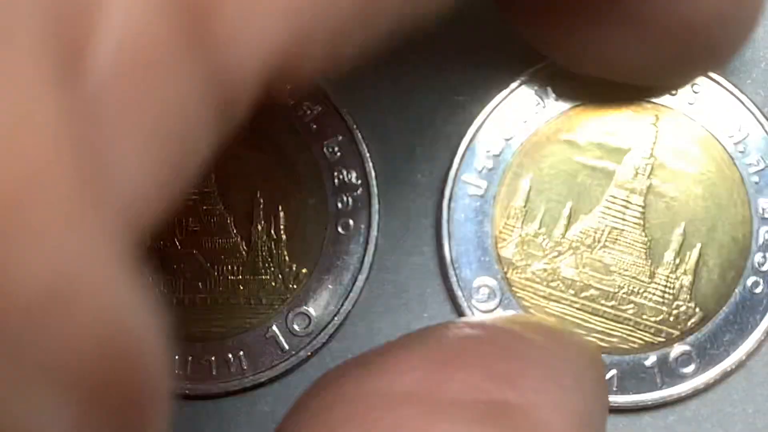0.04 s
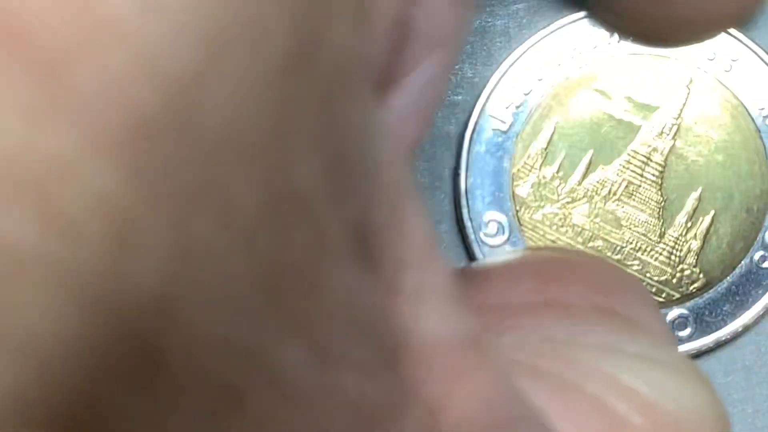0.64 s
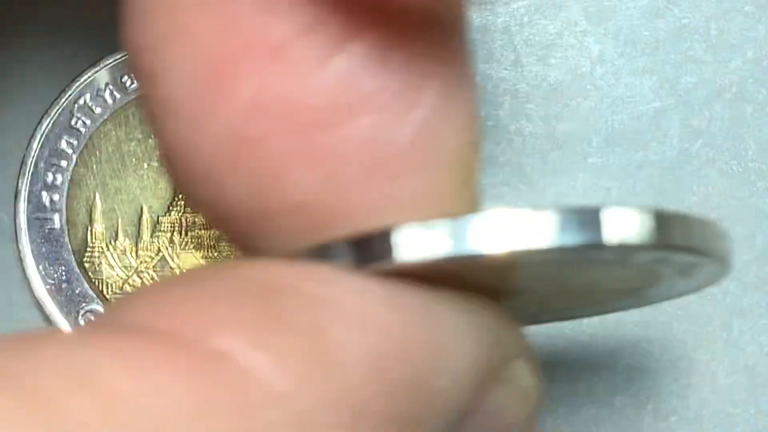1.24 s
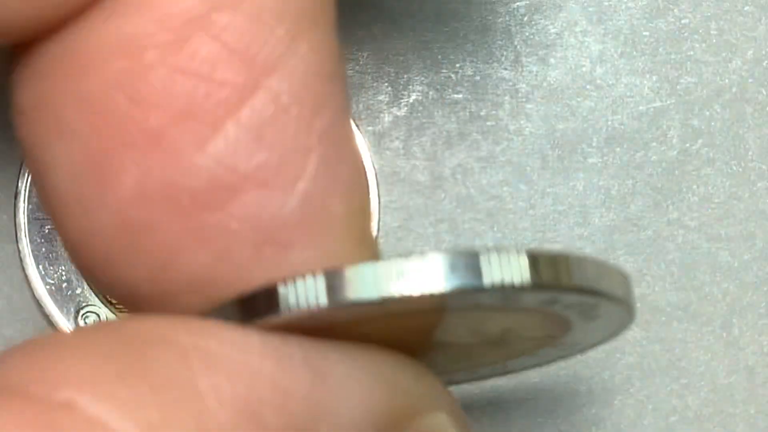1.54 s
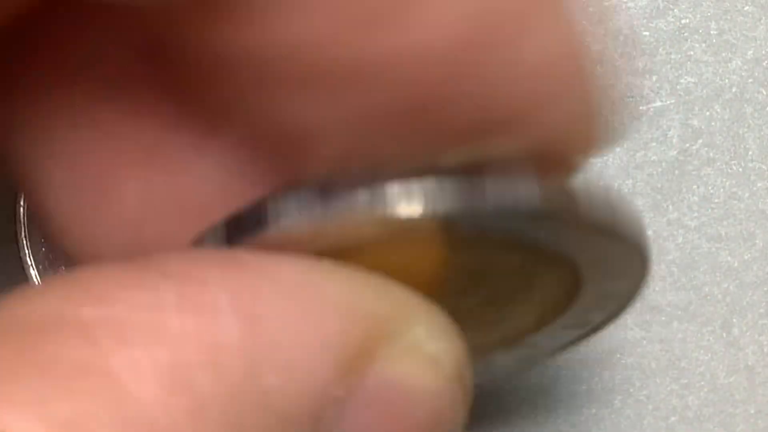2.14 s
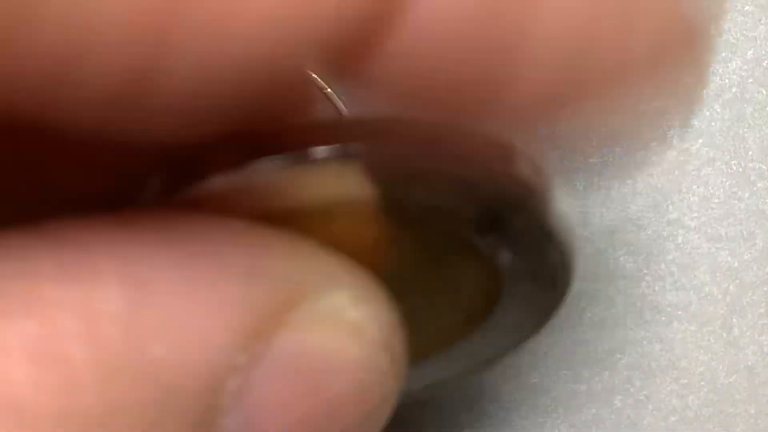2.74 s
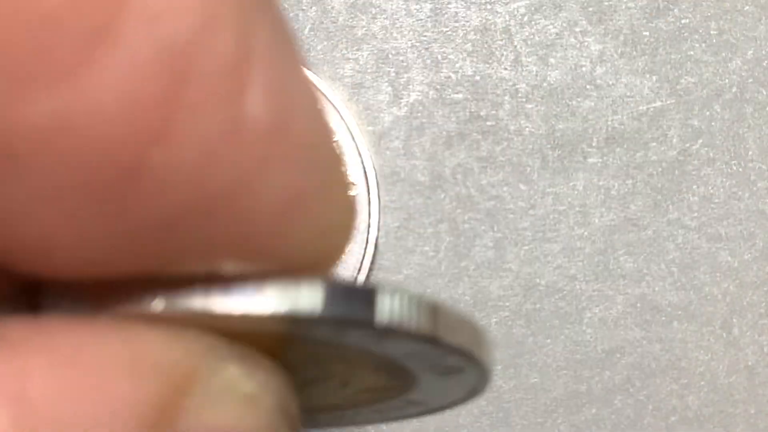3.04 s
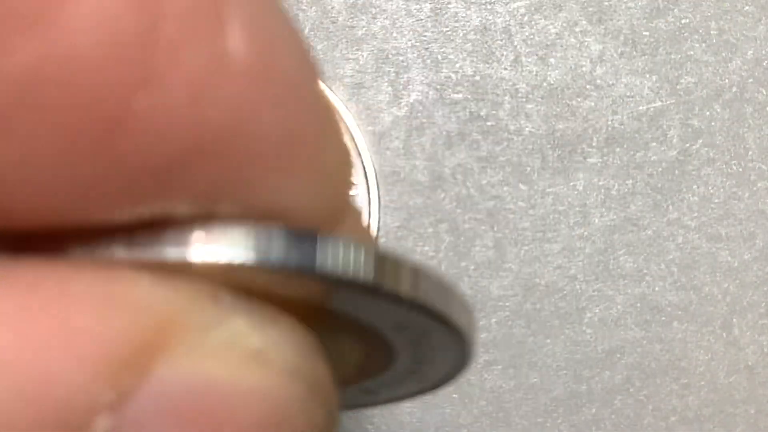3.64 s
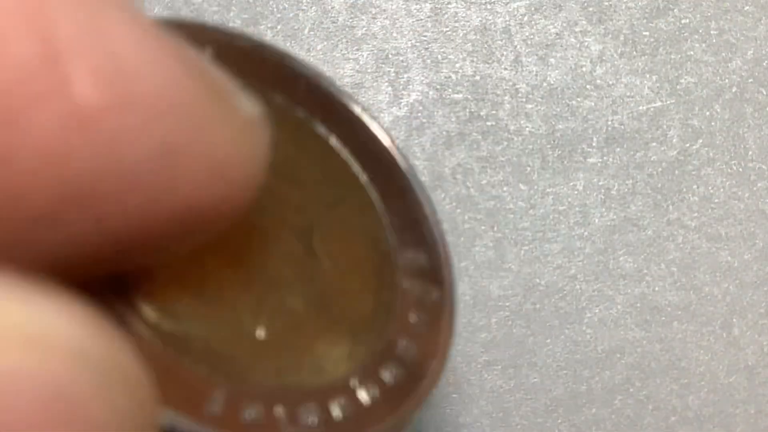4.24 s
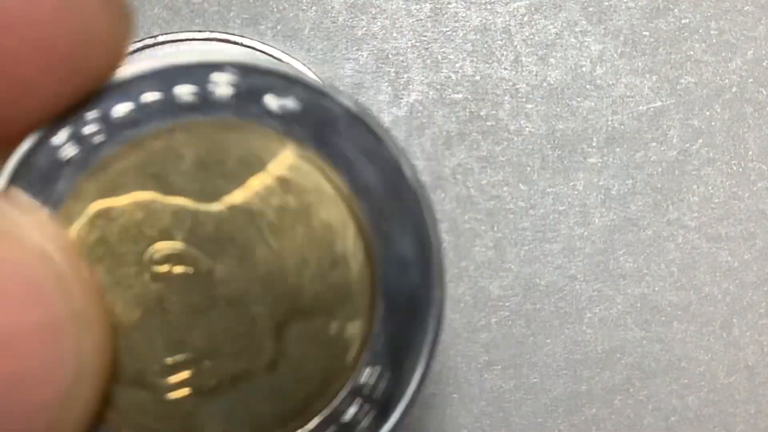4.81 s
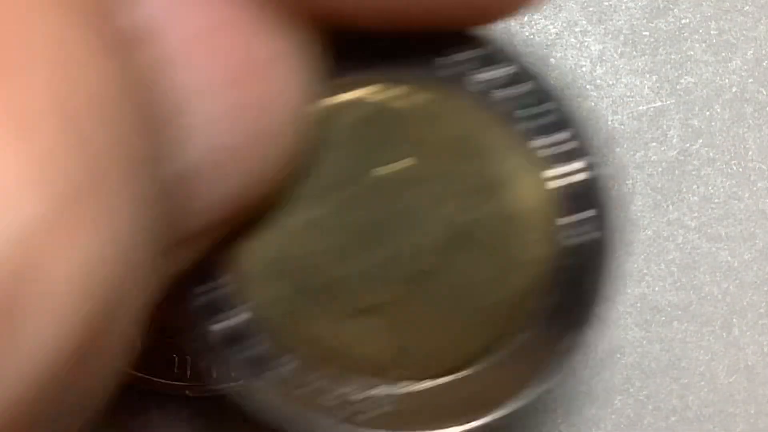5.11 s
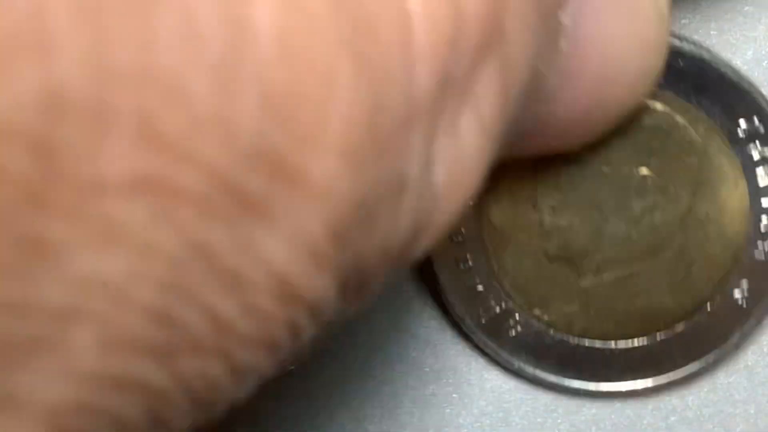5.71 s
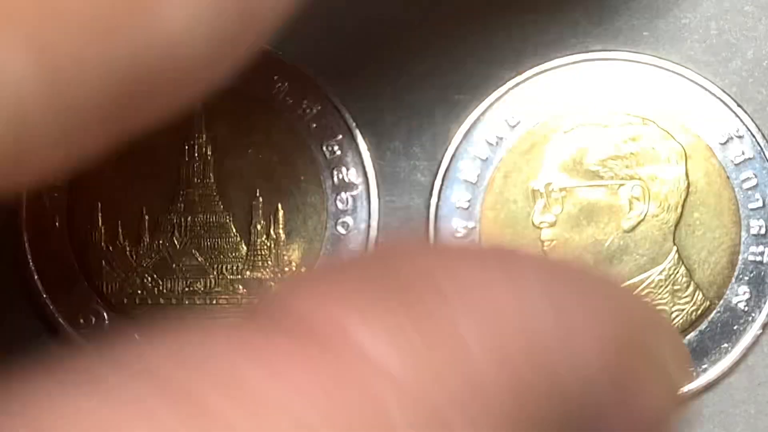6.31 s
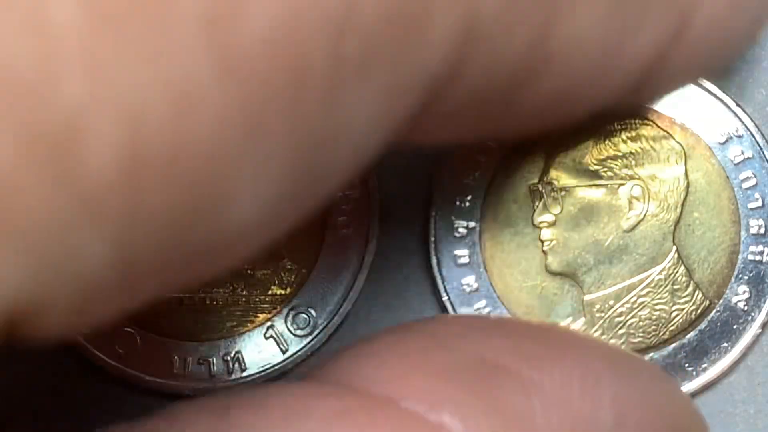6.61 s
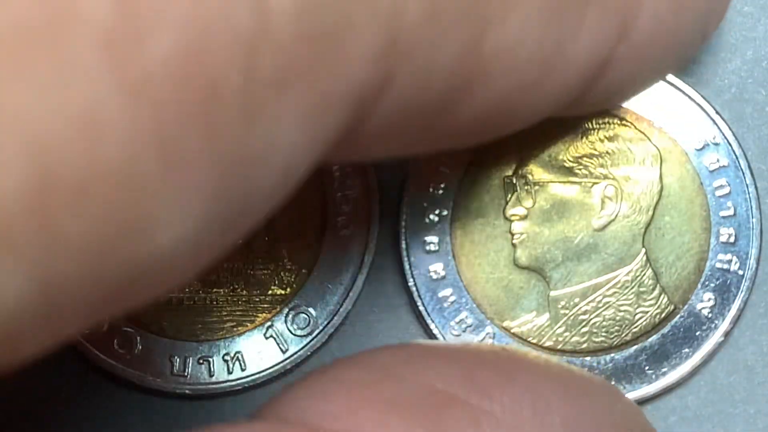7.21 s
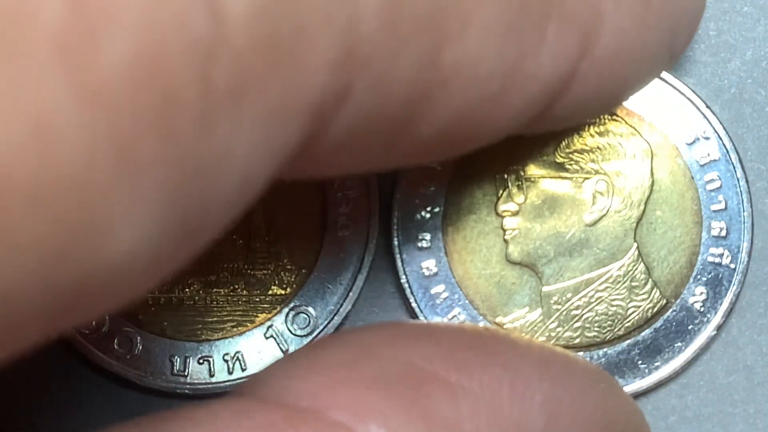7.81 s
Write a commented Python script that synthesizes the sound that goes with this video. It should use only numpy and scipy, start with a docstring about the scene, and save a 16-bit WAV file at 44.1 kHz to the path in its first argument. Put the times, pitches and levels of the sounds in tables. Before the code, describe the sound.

Close to the microphone, in a small room with a steady low rumble, a coin is picked up from a table with a short scraping click. Very soft, high rubs follow as fingers turn it over. Later its edge knocks on the table and slides in small scrapes, before the coin drops and rattles quickly to rest with a thin metallic ring, the loudest sound. Only faint ticks and slides come afterwards.

```python
"""A coin scrapes softly off a tabletop, is turned in the fingers, slid on its edge and let fall flat.
Its rim chatters on the table, which answers with a short hollow knock; the coin rings thinly between
the bounces. Skin whispers over the ridged rim. It all happens close by, in a small quiet room with a
low rumble and a few far whistles."""
import sys
import numpy as np
from scipy import signal
from scipy.fft import rfft, irfft, next_fast_len
from scipy.io import wavfile
from scipy.ndimage import uniform_filter1d

SR = 44100
rng = np.random.default_rng(int(sys.argv[2]) if len(sys.argv) > 2 else 0)


def wav_out(sig):
    """Save sig, one row per channel (or a flat mono array), as 16-bit PCM at SR to the path in sys.argv[1]."""
    wavfile.write(sys.argv[1], SR, np.round(np.clip(np.atleast_2d(sig).T, -1, 1) * 32767).astype(np.int16))


N = 355313
SIZE = 2 ** 13  # samples in one short working block
FREQ = np.arange(SIZE // 2 + 1) * SR / SIZE  # the frequencies in Hz at which filter gains are given

# The pitches at which the tabletop rings: pitch_hz, width_hz, level_db
TABLE_RESONANCES = [(107, 8.3, -15), (224, 26, -13.5), (444, 37, -4), (570, 120, -1), (684, 41, -4.5),
                    (1110, 110, -5), (1442, 78, -2), (1615, 70, -5.5), (2050, 98, -2.5), (2360, 59, -12),
                    (2650, 36, -13), (3200, 300, -12.5), (4000, 380, -14), (4680, 300, -17.5),
                    (5560, 130, -20.5), (8330, 200, -20), (10040, 990, -27), (12360, 140, -25)]


def undb(db):
    """Turn decibels into a gain to multiply by."""
    return 10 ** (np.asarray(db) / 20)


def unit(x):
    """Scale a sound to an average (rms) level of 1."""
    return x / np.sqrt(np.mean(x ** 2))


def add(out, x, start):
    """Mix x into out from this sample on."""
    first, last = max(start, 0), min(start + len(x), len(out))
    out[first:last] += x[first - start:last - start]


def fade(t, fade_s):
    """A gain that falls by 60 dB every fade_s seconds."""
    return np.exp(-np.log(1000) * t / fade_s)


def colour(points):
    """Gain at every frequency, joining up (pitch_hz, level_db) points."""
    hz, db = np.transpose(points)
    return undb(np.interp(np.log(FREQ + 1), np.log(hz), db))


def tilt(db_per_octave):
    """Gain that slopes above 500 Hz: harder contacts sound brighter."""
    return undb(db_per_octave * np.log2(np.maximum(FREQ, 500) / 1000))


def resonances(peaks):
    """Power at every frequency of (pitch_hz, width_hz, level_db) peaks."""
    return sum(undb(db) ** 2 / (1 + ((FREQ ** 2 - hz ** 2) / (width * np.minimum(FREQ + 1, hz))) ** 2)
               for hz, width, db in peaks)


def shape(x, gain):
    """Filter a sound by a gain at every frequency."""
    size = next_fast_len(len(x), real=True)
    hz = np.arange(size // 2 + 1) * SR / size
    return irfft(rfft(x, size) * np.interp(hz, FREQ, gain), size)[:N]


def room_tone(level_db=-60, low_cut_hz=48):
    """The room rumbles steadily under a smooth, thin hiss."""
    # Tone of the rumble and hiss: pitch_hz, level_db
    tone = [(25, -35), (50, -6.5), (100, -2.5), (170, -6.5), (290, -9), (400, -19.5), (600, -31.5),
            (1170, -41.5), (2300, -44), (4000, -46), (7000, -48), (9500, -45), (12200, -47), (15500, -46)]
    # Low resonances of the room, on top of the rumble: pitch_hz, width_hz, level_db
    booms = [(66.4, 7.4, 7), (115, 6.7, 3.5)]
    low_cut = 1 / np.sqrt(1 + (low_cut_hz / (FREQ + 1)) ** 8)
    gain = colour(tone) * np.sqrt(1 + resonances(booms)) * low_cut
    return undb(level_db) * unit(shape(rng.standard_normal(N), gain))


def far_whistles(note_s=0.082, echo_s=0.55, waver=0.065, waver_s=0.0027):
    """Short, hoarse falling notes, so distant that only their blurred echo arrives."""
    # A soft hoot and faint whistles: start_s, start_pitch_hz, level_db
    notes = [(4.05, 565, -74), (5.334, 2670, -80.5), (7.047, 5420, -78), (7.235, 2806, -84),
             (7.395, 2085, -75), (7.93, 6500, -81)]
    out = np.zeros(N)
    t = np.arange(SR // 2) / SR
    progress = np.linspace(0, 1, int(note_s * SR))
    for at, start_hz, db in notes:
        hoarse = unit(uniform_filter1d(rng.standard_normal(len(t)), int(waver_s * SR) + 1))
        fall_octaves = 0.12 * start_hz / 1000  # higher notes fall further
        hz = start_hz * 2 ** (-fall_octaves * progress) * (1 + waver * hoarse[:len(progress)])
        note = np.sqrt(progress * (1 - progress)) * np.sin(2 * np.pi * np.cumsum(hz) / SR)
        echo = signal.fftconvolve(note, rng.standard_normal(len(t)) * fade(t, echo_s))
        add(out, undb(db) * echo * np.sqrt(len(note)) / np.linalg.norm(echo), int(at * SR))
    return out


def wall_echo(x, level_db=-25, treble_db=-4, bass_s=0.23, treble_s=0.18, split_hz=2600):
    """The walls send back a faint, short echo whose treble dies first."""
    t = np.arange(SR // 2) / SR
    filters = [signal.butter(2, split_hz, kind, fs=SR, output="sos") for kind in ("low", "high")]
    bass, treble = (signal.sosfilt(sos, rng.standard_normal(len(t))) for sos in filters)
    tail = bass * fade(t, bass_s) + undb(treble_db) * treble * fade(t, treble_s)
    tail *= np.clip(t / 0.0028 - 0.5, 0, 1)  # the echo arrives a moment late
    return undb(level_db) * signal.fftconvolve(x, tail / np.linalg.norm(tail))[:N]


def tiny_slips(per_s, spread_db, size=N):
    """Friction: a dense stream of tiny slips of unequal size."""
    slips = (rng.random(size) < per_s / SR) * rng.standard_normal(size)
    return unit(slips * undb(spread_db * np.minimum(rng.exponential(size=size), 4)))


def uneven_grip(size, catches_per_s, spread_db=2):
    """A gain that wobbles as two surfaces catch and let go."""
    grip = np.interp(np.arange(size) / SR * catches_per_s, np.arange(SIZE), rng.standard_normal(SIZE))
    return unit(undb(spread_db * grip))


def stroke(age, db, length_s, swell_share=0.44):
    """Strength of one movement that speeds up, peaks at age 0 and slows to a stop."""
    side_s = length_s * np.where(age < 0, swell_share, 1 - swell_share)
    return undb(db) * np.exp(-np.minimum((age / side_s) ** 2, 100))


def grip_creeps(held_s=(1.5, 5.5), per_s=6.4, level_db=-82.5, spread_db=3, length_s=0.076, pressure=0.35):
    """List the faint slips of the fingers while they hold the coin up."""
    times = np.arange(*held_s, 1 / per_s)
    return [(at + late * length_s, level_db + spread_db * louder, length_s, pressure)
            for at, (late, louder) in zip(times, rng.standard_normal((len(times), 2)))]


def finger_rubs(firm_db=-2):
    """Skin rubs over the ridged rim: a very high whisper that reaches lower under pressure."""
    # Rubs as the coin is turned: peak_s, level_db, length_s, pressure (0 to 1)
    turns = [(0.405, -69, .05, 1), (0.79, -72, .19, 0.38), (1.11, -66.5, 0.065, .13),
             (1.207, -58.5, 0.06, 0.09), (1.29, -72.5, .13, .25), (1.653, -64.5, 0.021, .5),
             (1.762, -62, 0.064, .24), (2.112, -61, .048, 0.14), (2.642, -57.5, 0.032, 0.16),
             (2.815, -62, 0.046, 0.28), (3.196, -66.5, 0.04, .26), (3.40, -68.5, 0.073, 0.2),
             (3.781, -60.5, .048, 0.71), (3.958, -62, .048, 0.18), (4.43, -58, 0.07, .07),
             (4.55, -73, 0.042, 0.5), (4.645, -74, .04, 0.4), (5.533, -65, .058, 0.2),
             (5.833, -67.5, .026, .39), (6.58, -74.5, .12, .05), (7.04, -71.5, .023, 0.28),
             (7.589, -69, .028, .95)]
    # Tone of a light touch: pitch_hz, level_db
    light_tone = [(2000, -41), (6500, -24), (8300, -19), (9700, -6.5), (11300, -15), (13500, -1),
                  (16000, -2)]
    # Tone that firm pressure adds: pitch_hz, level_db
    firm_tone = [(400, -17.5), (1100, -4), (2000, -0.5), (3200, -8), (5000, -0.5), (7000, -5.5),
                 (9500, -0.5), (16000, -3)]
    light_power, firm_power = np.zeros((2, N))
    age = np.arange(SR // 2) / SR - 0.25
    for at, db, length_s, pressure in turns + grip_creeps():
        power = stroke(age, db, length_s) ** 2
        start = int((at + age[0]) * SR)
        add(light_power, power, start)
        add(firm_power, power * pressure ** 2, start)
    whisper = unit(shape(tiny_slips(per_s=19000, spread_db=0), colour(light_tone)))
    rasp = unit(shape(tiny_slips(per_s=12000, spread_db=1), colour(firm_tone)))
    skin = np.sqrt(light_power) * whisper + undb(firm_db) * np.sqrt(firm_power) * rasp
    return uneven_grip(N, catches_per_s=110) * skin


def table_tone(peaks, click_db=0):
    """Gain of the tabletop at every frequency: its resonances over a dry click."""
    # Tone of the click between the resonances: pitch_hz, level_db
    click = [(40, -36.5), (90, -18.5), (330, -18.5), (800, -14), (1700, -12), (3500, -20.5), (6500, -29),
             (9000, -31.5), (13000, -34.5), (16000, -29.5)]
    return np.sqrt((undb(click_db) * colour(click)) ** 2 + resonances(peaks))


def table_ring(gain, lag_at_1khz_s=0.0013):
    """The table's answer to one tap; the tap travels as bending waves, which bring the bass late."""
    # Folding the cepstrum (the log gain turned into time) makes the ring come after the tap.
    cepstrum = irfft(np.log(gain))
    cepstrum[1:SIZE // 2] *= 2
    cepstrum[SIZE // 2 + 1:] = 0
    bending_phase = 4 * np.pi * lag_at_1khz_s * np.sqrt(1000 * FREQ)
    ring = irfft(np.exp(rfft(cepstrum) - 1j * bending_phase))[:SIZE // 2]
    return ring / np.linalg.norm(ring)


def coin_slides(on_edge_s=(5.4, 5.82), spot_spread_db=2):
    """The coin catches on the table's fine grain; every spot stirs the resonances differently."""
    # Slides across the table: peak_s, level_db, length_s
    moves = [(0.04, -64, 0.074), (0.148, -60, 0.065), (0.259, -77, 0.17), (0.402, -58, .054),
             (0.48, -69.5, 0.15), (0.92, -52, 0.032), (0.933, -42, 0.02), (5.46, -54, .055),
             (5.53, -47, .04), (5.602, -44.5, 0.032), (5.639, -63.5, .06), (5.692, -49, .034),
             (5.718, -51, .02), (5.772, -53, .04), (5.846, -40.5, .032), (6.385, -67.5, .14),
             (6.616, -65.5, 0.11), (6.72, -75, 0.09), (6.817, -69.5, 0.072), (7.038, -62.5, .023),
             (8.024, -64.5, .03)]
    # Tone of the scraping force: pitch_hz, level_db
    scrape_tone = [(100, -0.5), (550, 3), (1100, -5.5), (2100, -3), (3300, -4.5), (4400, -2), (5500, -8),
                   (10000, -12.5), (16000, -15)]
    out = np.zeros(N)
    age = np.arange(SR // 2) / SR - 0.25
    for at, db, length_s in moves:
        peaks = [(hz, width, peak_db + spot_spread_db * rng.standard_normal())
                 for hz, width, peak_db in TABLE_RESONANCES]
        brightness = tilt(-4 if on_edge_s[0] < at < on_edge_s[1] else -0.23)  # duller on edge than flat
        ring = table_ring(table_tone(peaks, click_db=0.5) * colour(scrape_tone) * brightness)
        force = stroke(age, db, length_s) * uneven_grip(len(age), catches_per_s=150)
        force *= tiny_slips(per_s=3400, spread_db=2, size=len(age))
        add(out, signal.fftconvolve(force, ring), int((at + age[0]) * SR))
    return out


def coin_knocks(bouncing_s=(5.85, 5.935), free_db=-27.5, damped_db=-50, chatter_per_s=6000,
                build_up_share=0.36, spot_width_hz=110, spot_db=5):
    """Each blow is a burst of tiny rim taps around one firm strike; it rings both table and coin."""
    # The rim hits the table: strike_s, level_db, chatter_s, brightness_db_per_octave, spot_pitch_hz
    blows = [(0.189, -64, .0015, -12, 1100), (0.7036, -57, 0.0018, -10, 517), (0.7445, -67, .002, 3, 1970),
             (0.9364, -40, 0.0039, -2, 597), (0.9407, -37, 0.0043, -1, 1450),
             (5.4219, -31.5, 0.0018, -4.5, 1170), (5.858, -16, .0035, 0, 1970),
             (5.9005, -18, .006, 0, 1390), (5.932, -20.5, .0042, 0.05, 1490),
             (5.940, -29, .005, -1.5, 1380), (5.9549, -23.5, .006, -1, 1594),
             (5.9685, -25.5, .007, -2, 450), (6.3478, -62.5, 0.0015, -3.5, 1430),
             (6.452, -54, .002, -9.5, 1465)]
    # The coin's own two ringing tones: pitch_hz, level_db, fade_s
    coin_tones = [(10170, 1.5, .1), (11150, -1, 0.092)]
    out = np.zeros(N)
    table = table_tone(TABLE_RESONANCES)
    lead = SIZE // 4  # samples before the firm strike
    t = np.arange(SIZE) / SR
    age = t - lead / SR
    for at, db, chatter_s, brightness, spot_hz in blows:
        side_s = chatter_s * np.where(age < 0, build_up_share, 1 - build_up_share)
        taps = rng.standard_normal(SIZE) * (rng.random(SIZE) < chatter_per_s / SR)
        force = np.exp(-np.abs(age) / side_s) * taps
        force[lead] += 1  # the firm strike
        spot = np.sqrt(1.5 + resonances([(spot_hz, spot_width_hz, spot_db)]))  # each spot favours a pitch
        knock = signal.fftconvolve(-force, table_ring(table * spot * tilt(brightness)))
        knock /= np.sqrt(np.sum(knock ** 2) / (SR / 100))  # level 1 if its energy were spread over 10 ms
        # The coin rings freely while it bounces; held or lying flat, it is damped.
        ring_db = free_db if bouncing_s[0] < at < bouncing_s[1] else damped_db
        for hz, tone_db, fade_s in coin_tones:
            ring = np.sin(2 * np.pi * hz * t) * fade(t, fade_s)
            knock[lead:lead + SIZE] += undb(ring_db + tone_db) * ring
        add(out, undb(db) * knock, int(at * SR) - lead)
    return out


def scene():
    """Coin, table and fingers close by, with the quiet room behind them."""
    near = coin_knocks() + coin_slides() + finger_rubs()
    return (near + wall_echo(near) + far_whistles() + room_tone())[None]


def record(dry):
    """Cut away the very highest treble, above 15900 Hz."""
    return signal.sosfilt(signal.ellip(10, 0.2, 70, 15900, fs=SR, output="sos"), dry)


dry = scene()
out = record(dry)
wav_out(out)
```